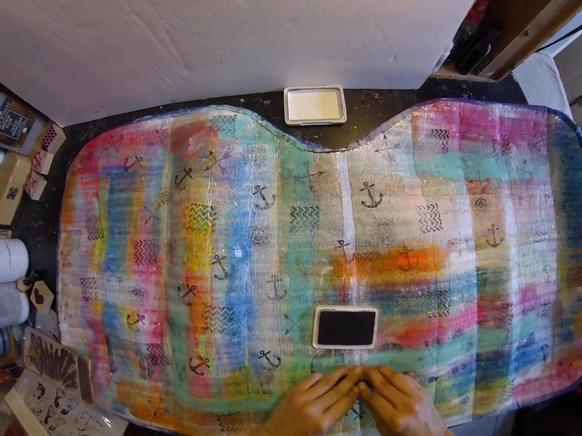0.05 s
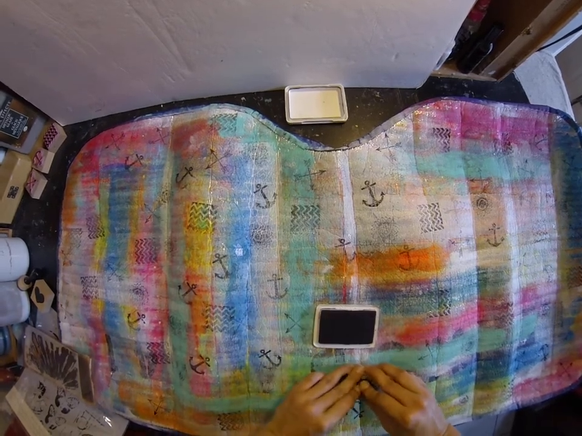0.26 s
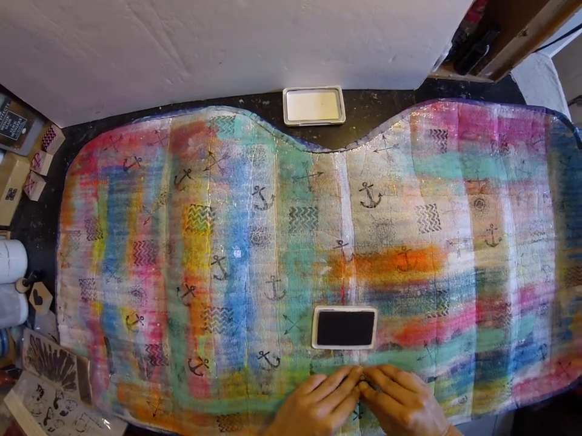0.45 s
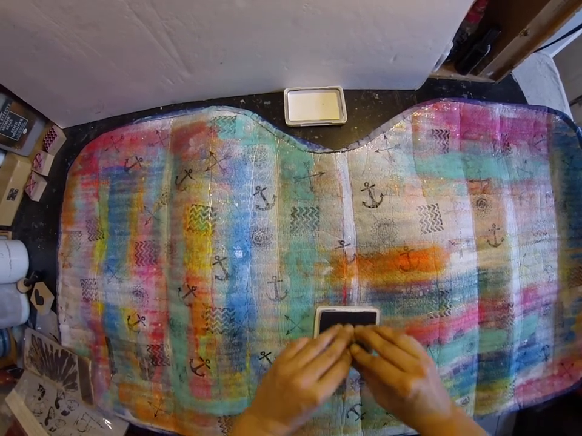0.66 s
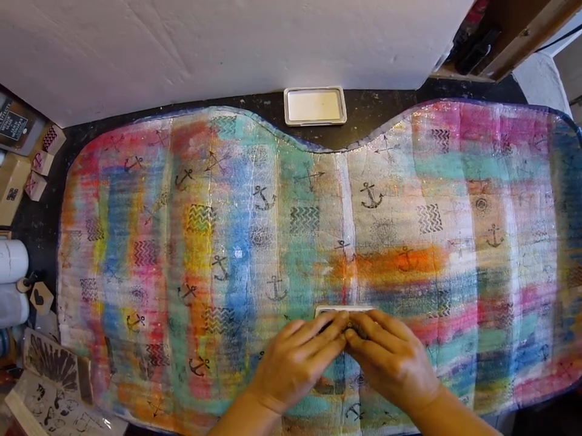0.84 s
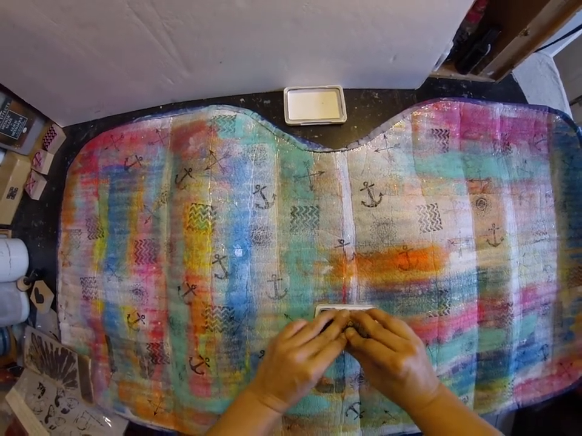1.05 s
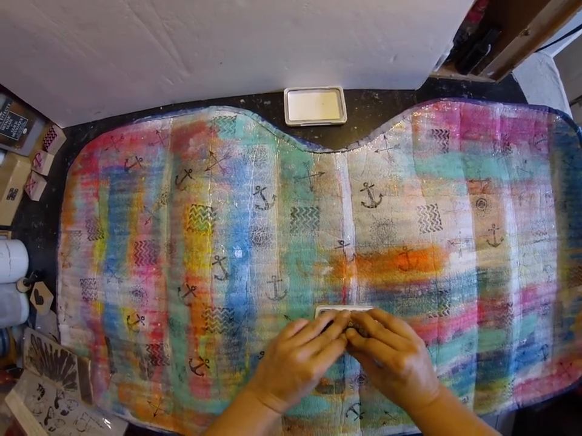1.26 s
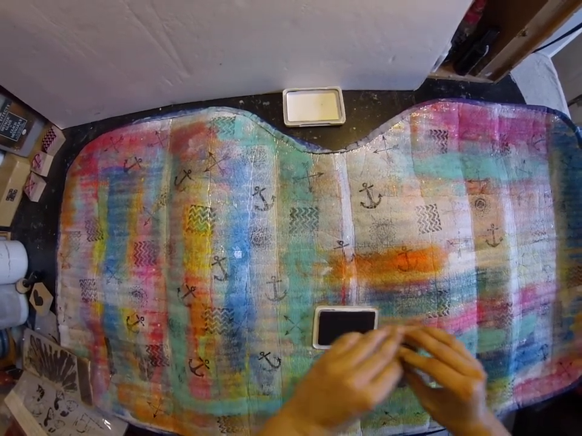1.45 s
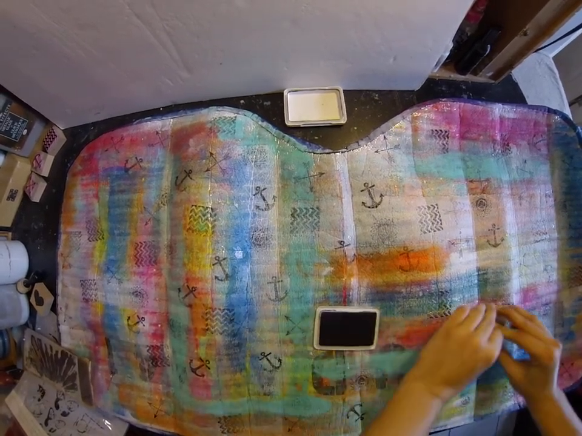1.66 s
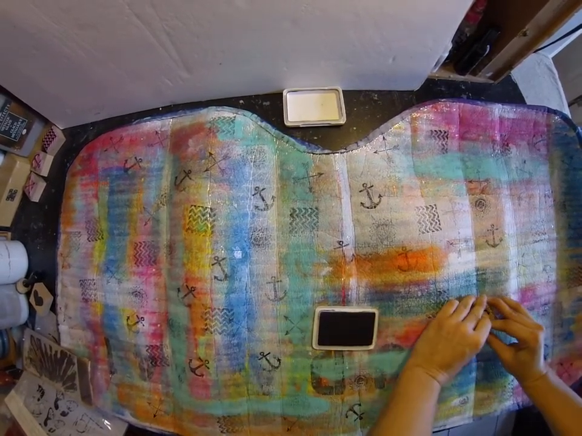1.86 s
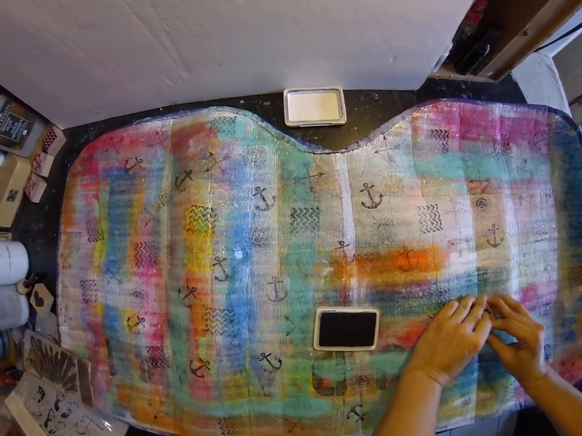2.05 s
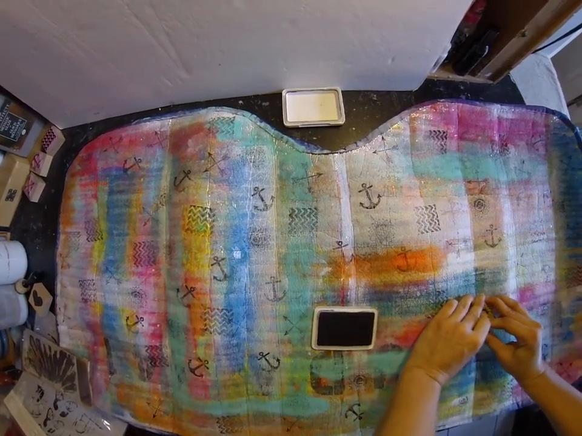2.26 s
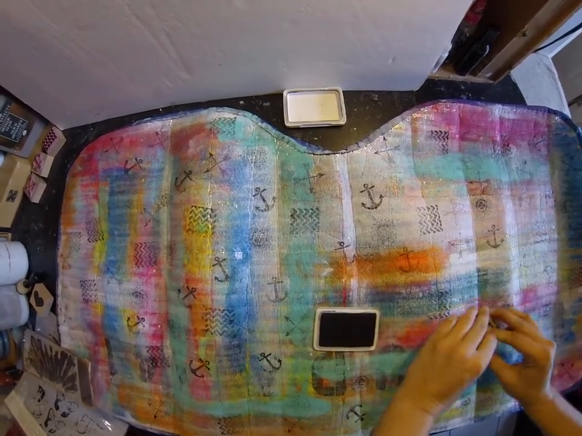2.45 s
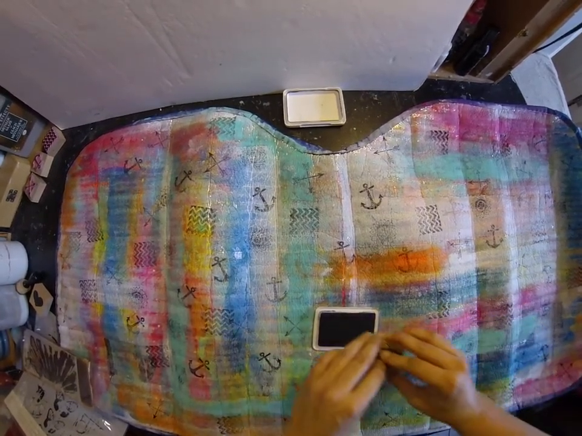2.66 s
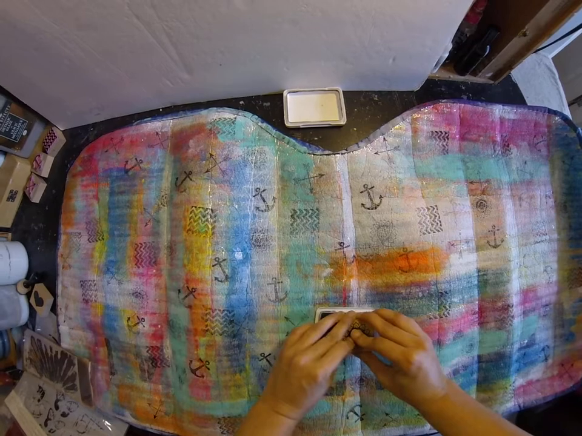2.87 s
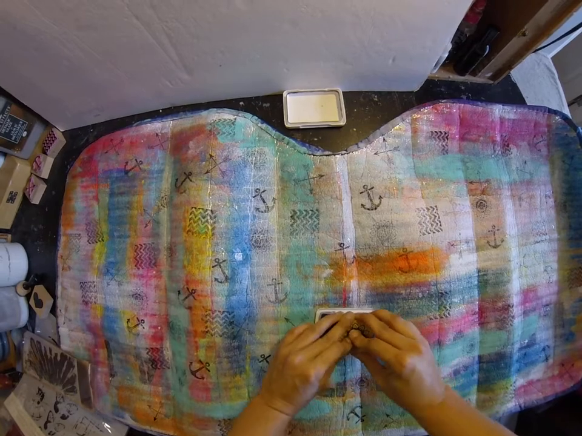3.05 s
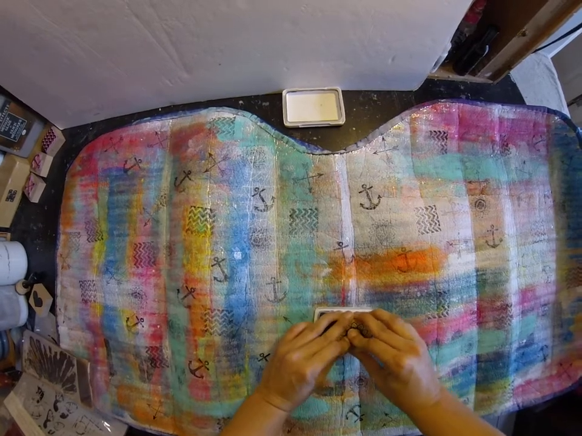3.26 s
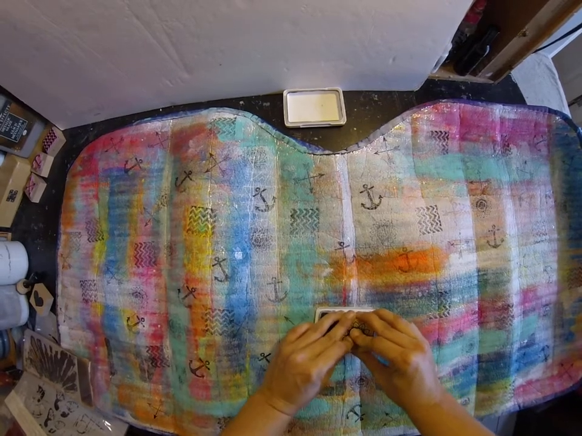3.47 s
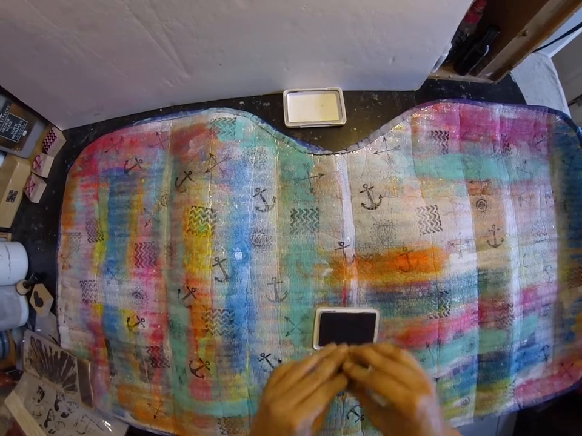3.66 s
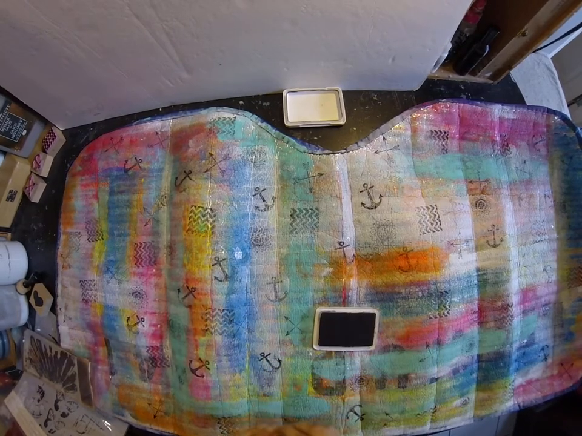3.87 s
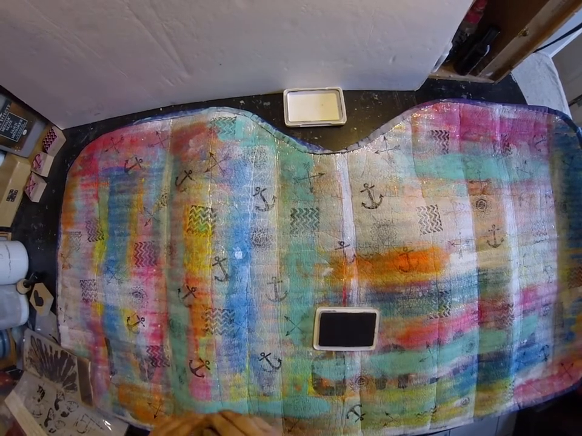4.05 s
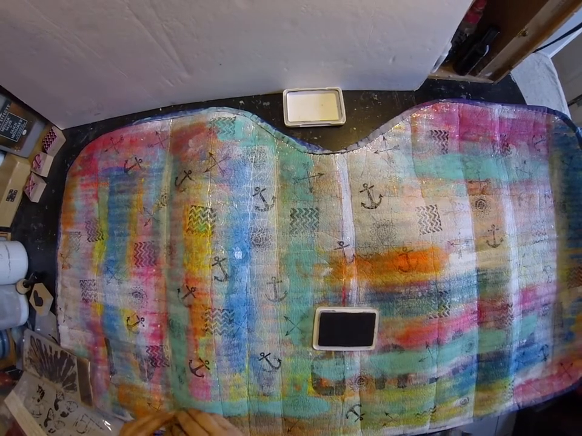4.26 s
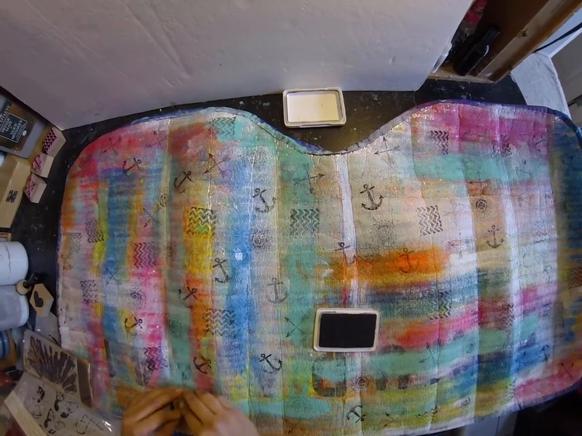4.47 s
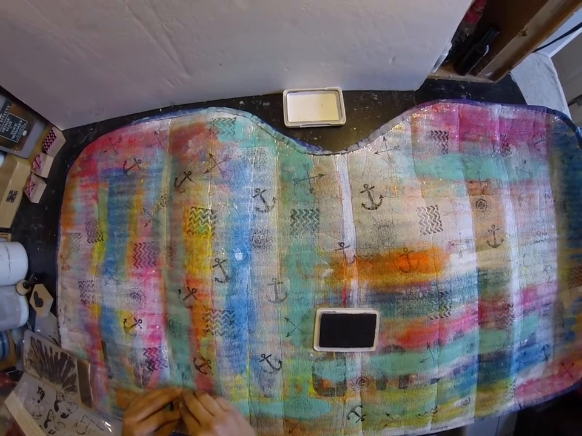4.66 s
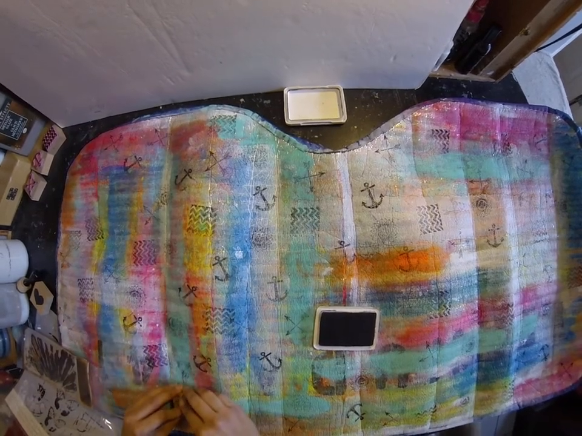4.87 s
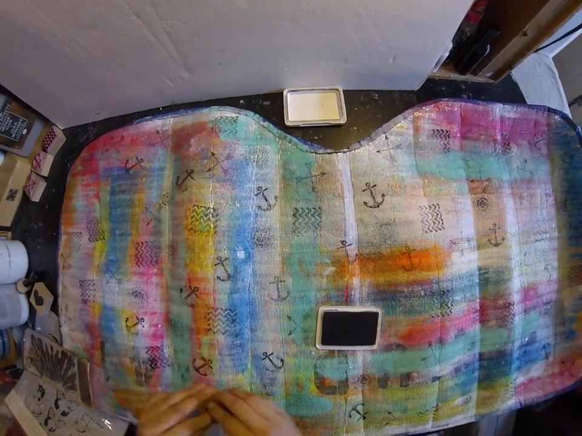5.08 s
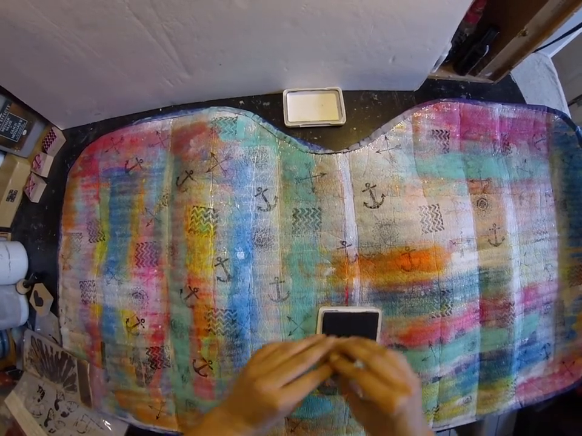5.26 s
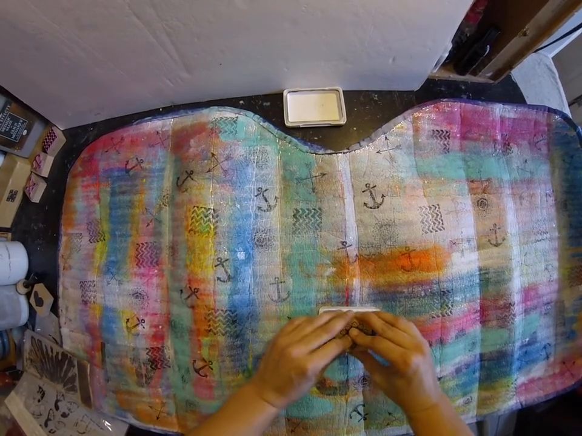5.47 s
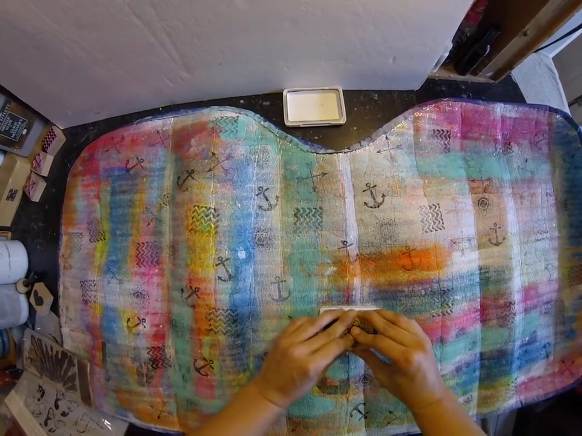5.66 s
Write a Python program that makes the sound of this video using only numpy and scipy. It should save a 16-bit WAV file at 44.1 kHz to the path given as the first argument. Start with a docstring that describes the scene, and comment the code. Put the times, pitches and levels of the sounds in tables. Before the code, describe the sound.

In a small room, light clicks and bumps come from a wooden stamp block turning in the fingers. Five low table thumps follow at an even pace, with brighter knocks on the ink pad and duller ones on padded cloth. Between them come sticky ticks, peeling crackles and soft rubbing. A faint hum swells early and fades, while the microphone carries constant hiss, rumble and a very thin, high whine.

```python
"""First come soft ticks and bumps as a rubber stamp on a wooden block is handled. It is then tapped
in turn on an ink pad and on a padded sunshade lying on a table. Each press thumps the table and
knocks the block; tacky rubber crackles as it peels off, and the fabric rustles. A low hum comes
and goes in the small room, over a steady rumble and the hiss and thin pulsing whine of a camera."""
import sys
import numpy as np
from scipy import signal
from scipy.fft import rfft, irfft
from scipy.io import wavfile
from scipy.ndimage import uniform_filter1d

SR = 44100
rng = np.random.default_rng(int(sys.argv[2]) if len(sys.argv) > 2 else 0)


def put_to_file(sound):
    """Save the sound as 16-bit audio at rate SR, in the file named by the first command-line argument."""
    columns = np.atleast_2d(sound).T  # one column per channel
    safe = np.clip(columns, -1, 1)
    whole_steps = np.round(safe * 32767)
    wavfile.write(sys.argv[1], SR, whole_steps.astype(np.int16))


N = 252252

# room rumble and microphone hiss: (frequency [Hz], relative level [dB])
AIR_SPECTRUM = [(8, 1.5), (28, -1.5), (43, 0.5), (60, -13.5), (85, -16), (135, -16.5), (210, -24.5),
                (480, -30), (950, -36.5), (1400, -37), (2100, -41.5), (4000, -42), (11500, -41),
                (15000, -38.5)]
# how long the room rings; a ring time (t60) is a fall of 60 dB: (frequency [Hz], ring time [s])
ROOM_RING_TIMES = [(150, 0.48), (500, 0.36), (2000, 0.2), (6000, 0.32), (14000, 0.23)]
# hands and rubber slide: (time [s], length [s], level [dB], centre [Hz], width [octaves])
RUBS = [(.0, 0.081, -46, 12200, 0.45), (0.177, 0.31, -55.5, 229, 2.6), (1.2, 0.66, -61.5, 5100, 0.35),
        (1.732, 0.16, -55.5, 5160, 0.65), (2.236, 0.039, -47, 1300, 3.9), (2.999, 0.48, -53, 148, 1.65),
        (3.391, .2, -55.5, 5500, 2.8), (3.593, .12, -54.5, 7500, 2), (4.553, .13, -50.5, 1980, 2.1),
        (4.717, 0.095, -53, 1990, 3.4), (5.521, 0.34, -45, 7350, 1.9), (5.602, 0.14, -51.5, 1500, 1.6)]
# the handled things squeak: (time [s], pitch [Hz], level [dB], rise [s], ring time [s])
SQUEAKS = [(1.025, 593, -27.5, 0.022, 0.068), (1.755, 1090, -33.5, 0.0098, 0.048),
           (3.147, 558, -30.5, 0.022, 0.12), (4.421, 2910, -44.5, 0.0006, .17)]
# sticky spots of ink let go: (time [s], level [dB], decay [s])
INK_TICKS = [(0.0257, -31, 0.0018), (0.0375, -35, .001), (0.359, -40, 0.0025), (1.414, -42, .004),
             (1.7315, -39, .002), (2.042, -37.5, 0.0091), (2.0526, -35, 0.0017), (2.2144, -38, .006),
             (2.2400, -32.5, .0014), (4.8656, -40, 0.0062), (3.645, -50, 0.0073), (5.5885, -40, .014),
             (5.6383, -34.5, 0.0027)]
# the block rocks under the fingers: (time [s], level [dB], decay [s], low edge [Hz], high edge [Hz])
FINGER_TAPS = [(0.053, -47.5, 0.018, 497, 4200), (0.161, -46, 0.01, 450, 2170),
               (0.535, -45, 0.0035, 450, 1690), (2.040, -36.5, 0.0037, 900, 2880),
               (3.027, -38.5, 0.0054, 694, 4830), (4.306, -44.5, 0.014, 1030, 2230),
               (4.42, -43, 0.0036, 980, 3800), (5.675, -40.5, 0.0074, 950, 2230)]
# the stamp peels off the cloth:
# (release time [s], cling length [s], crackle [dB], clack [dB], fizz [dB], snap decay [s])
PEELS = [(0.3885, 0.068, -47, -29, -28, 0.0029), (2.2600, .06, -48, -39.5, -30.5, .0035),
         (4.876, 0.026, -35, -35.5, -39, 0.0088)]
# the block bumps lightly as it is handled: (time [s], knock [dB], dull above [Hz], thud [dB])
BUMPS = [(.104, -32, 300, -37), (.137, -20.5, 450, -36), (0.1968, -11, 557, -31), (.211, -17.5, 540, -41),
         (0.362, -19, 450, -38.5), (0.5347, -21, 650, -36.5), (1.35, -23.5, 700, -42),
         (2.044, -23, 710, -46), (3.646, -24.5, 945, -38), (4.726, -23.5, 1160, -54),
         (4.874, -23, 605, -53)]
# tones the block rings with on the table top: (pitch [Hz], relative level [dB], ring time [s])
BLOCK_MODES = [(204.6, -33.5, 0.12), (266.6, -20.5, 0.07), (313, -16.5, 0.078), (352.2, -20.5, 0.1),
               (397, -17, 0.078), (479.3, -18.5, 0.072), (512, -20, 0.056), (574, -29, 0.1),
               (703, -21.5, 0.077), (810, -27.5, 0.076), (983, -17.5, 0.028), (1150, -15.5, 0.024),
               (1180, -24.5, 0.026), (1242, -30, 0.032), (1970, -22, 0.021)]
# low tones of the table: (pitch [Hz], relative level [dB], ring time [s])
TABLE_MODES = [(43.8, -4.5, .24), (55.2, -4.5, 0.19), (65.3, -26, 0.59), (86.5, -25, 0.12),
               (115, -12.5, 0.092), (129.1, -19, 0.31)]
# the stamp comes down, in turn on ink pad and cloth: (time [s], thump [dB], thump tilt [dB/octave],
# knock [dB], dull above [Hz], thud [dB], clack [dB], fizz [dB], time to sink in [s], slap decay [s])
PRESSES = [(0.6374, -2.5, 0, -5, 1510, -29, -38.5, -33, 0.00028, 0.0065),
           (1.6521, 0, 0, -15, 190, -18.5, -35.5, -27.5, 0.0022, 0.0076),
           (2.701, 2, 1.5, 3, 1590, -25.5, -26, -27.5, 0.00026, 0.0036),
           (4.352, -0.5, 1, -9.5, 298, -31, -39.5, -35.5, .008, .019),
           (5.310, -4.5, 4, -6, 710, -36, -39.5, -37, 0.00037, 0.01)]


def gain_of(db):
    """Turns decibels into a factor to multiply by."""
    return 10 ** (np.asarray(db) / 20)


def unit_rms(x):
    """Scales a signal to an average (rms) size of 1."""
    return x / np.sqrt(np.mean(x ** 2) + 1e-20)


def curve_at(points, hz):
    """Joins (frequency, value) points along a log-frequency axis."""
    point_hz, value = np.transpose(points)
    return np.interp(np.log(hz + 1), np.log(point_hz + 1), value)


def add(mix, s, sound):
    """Adds a sound to the mix, starting s seconds in."""
    part = mix[max(round(s * SR), 0):][:len(sound)]
    part += sound[:len(part)]


def ring(t, hz, db, t60):
    """One tone that dies away."""
    return gain_of(db) * np.exp(-np.log(1000) * t / t60) * np.sin(2 * np.pi * hz * t)


def hump(t, length):
    """A smooth rise and fall."""
    return np.sin(np.pi * np.clip(t / length, 0, 1)) ** 2


def wander(size, smooth_samples):
    """A smoothed random wobble."""
    return unit_rms(uniform_filter1d(rng.standard_normal(size), smooth_samples))


def grit(band_hz, grain_db, size):
    """Tiny slips of uneven size, heard in one band; more grain_db makes them rougher."""
    slips = rng.standard_normal(size) * gain_of(grain_db * np.minimum(rng.exponential(1, size), 4))
    band = signal.butter(2, band_hz, "band", fs=SR, output="sos")
    return unit_rms(signal.sosfilt(band, slips))


def stroke(length_s, db, band_hz, grain_db):
    """A run of slips that swells and fades."""
    t = np.arange(SR) / SR
    return gain_of(db) * hump(t, length_s) * grit(band_hz, grain_db, size=len(t))


def add_click(mix, s, db, band_hz, decay_s, rise_s=0.0002):
    """Adds a cluster of slips that builds up to time s and dies quickly."""
    lead_s = 5 * rise_s
    t = np.arange(SR // 6) / SR - lead_s
    force = np.exp(np.minimum(t / rise_s, -t / decay_s))
    burst = force * grit(band_hz, grain_db=7.5, size=len(t))
    add(mix, s - lead_s, gain_of(db) * burst * np.linalg.norm(force) / np.linalg.norm(burst))


def add_slap(mix, s, clack_db, fizz_db, decay_s, rise_s=0.00022):
    """Adds rubber meeting or leaving a surface: a clack with a sticky fizz above it."""
    clack_hz, fizz_hz = (830, 2400), (2840, 14800)
    add_click(mix, s, clack_db, clack_hz, decay_s, rise_s)
    add_click(mix, s, fizz_db, fizz_hz, decay_s, rise_s)


def air(level_db=-39):
    """Steady microphone hiss above a low room rumble."""
    hz = np.fft.rfftfreq(N, 1 / SR)
    spectrum = rfft(rng.standard_normal(N)) * gain_of(curve_at(AIR_SPECTRUM, hz))
    return gain_of(level_db) * unit_rms(irfft(spectrum, N))


def camera_whine(pitch_hz=12882, drift_hz=24, frame_hz=47.95, on_share=0.42, level_db=-62.3):
    """The camera's electronics whistle for a part of each frame, never quite on one pitch."""
    busy = np.arange(N) / SR * frame_hz % 1 < on_share
    pulses = uniform_filter1d(busy.astype(float), size=40)
    hz = pitch_hz + drift_hz * wander(N, smooth_samples=300)
    return gain_of(level_db) * unit_rms(pulses * np.sin(2 * np.pi * np.cumsum(hz) / SR))


def hum(pitch_hz=149, drift_hz=0.88, base_db=-44.5):
    """A nearly pure low tone that swells, throbs slowly, grows quieter and stops."""
    start_s, end_s, rise_s, fall_s = 1.33, 2.85, 0.27, 0.33
    throb_hz, throb_db, throb_peak_s = 1.65, 2, 1.83
    sag_db_per_s, waver_db = 5.5, 0.5
    t = np.arange(N) / SR
    steps_s = np.linspace(0, t[-1], 50)
    waver, drift = (np.interp(t, steps_s, row) for row in rng.standard_normal((2, 50)))
    fade = np.clip(np.minimum((t - start_s) / rise_s, (end_s - t) / fall_s), 0, 1)
    throb = throb_db * np.cos(2 * np.pi * throb_hz * (t - throb_peak_s))
    level = fade * gain_of(base_db - sag_db_per_s * (t - start_s) + throb + waver_db * waver)
    return np.sqrt(2) * level * np.sin(2 * np.pi * np.cumsum(pitch_hz + drift_hz * drift) / SR)


def room(sound, turn_s, gap_s=0.003, paths=5):
    """Dense echoes of a small room, each band dying at its own speed; the paths change every turn_s."""
    echoes = rng.standard_normal((paths, SR // 2)) * (np.arange(SR // 2) > gap_s * SR)
    hz, t, bands = signal.stft(echoes, SR, nperseg=256)
    decay = np.exp(-np.log(1000) * t / curve_at(ROOM_RING_TIMES, hz)[:, None])
    tails = signal.istft(bands * decay, SR, nperseg=256)[1]
    tails /= np.linalg.norm(tails, axis=1, keepdims=True)
    turn = (np.arange(N) / (turn_s * SR) - np.arange(paths)[:, None]) % paths
    feeds = sound * np.sqrt(hump(turn, 2.11))  # the turns overlap, so the power stays nearly even
    return signal.fftconvolve(feeds, tails, axes=1).sum(0)[:N]


def rubs():
    """Cloth fibres catch and let go as hands and rubber slide over them."""
    out = np.zeros(N)
    for s, length_s, db, centre_hz, octaves in RUBS:
        spread = 2 ** (octaves / 2)
        add(out, s, stroke(length_s, db, (centre_hz / spread, centre_hz * spread), grain_db=10))
    return out


def squeaks(waver_per_s=3.5):
    """Faint tones that swell and die; the slower they swell, the less steady their pitch."""
    t, out = np.arange(SR // 4) / SR, np.zeros(N)
    for s, hz, db, rise_s, t60 in SQUEAKS:
        waver = waver_per_s * rise_s * wander(len(t), smooth_samples=150)
        uneven_t = np.cumsum(1 + waver) / SR
        add(out, s, (1 - np.exp(-t / rise_s)) * ring(uneven_t, hz, db, t60))
    return out


def ink_ticks(band_hz=(6340, 16000)):
    """Sticky spots of ink part with thin, bright ticks."""
    out = np.zeros(N)
    for s, db, decay_s in INK_TICKS:
        add_click(out, s, db, band_hz, decay_s)
    return out


def finger_taps():
    """Small dry clacks as the fingers rock the block."""
    out = np.zeros(N)
    for s, db, decay_s, low_hz, high_hz in FINGER_TAPS:
        add_click(out, s, db, (low_hz, high_hz), decay_s)
    return out


def rubber_peels(crackle_hz=(2450, 15000), trail_s=0.028):
    """Tacky rubber clings to the cloth with a crackle, snaps free and crackles on for trail_s."""
    out = np.zeros(N)
    for s, cling_s, crackle_db, clack_db, fizz_db, decay_s in PEELS:
        add(out, s - cling_s, stroke(cling_s + trail_s, crackle_db, crackle_hz, grain_db=6))
        add_slap(out, s, clack_db, fizz_db, decay_s)
    return out


def rubber_slaps(lag_s=0.00107):
    """The rubber lands at once on the ink pad, but sinks into the cloth first."""
    out = np.zeros(N)
    for s, *_, clack_db, fizz_db, sink_s, decay_s in PRESSES:
        add_slap(out, s + lag_s, clack_db, fizz_db, decay_s, rise_s=sink_s)
    return out


def block_knocks(lag_s=0.001113, build_s=0.0016):
    """The block rings at each contact, dull on cloth and brighter on the ink pad; the padding thuds."""
    t, out = np.arange(SR // 3) / SR, np.zeros(N)
    landings = [(s + lag_s, knock_db, dull_hz, thud_db)
                for s, _, _, knock_db, dull_hz, thud_db, *_ in PRESSES]
    for s, knock_db, dull_hz, thud_db in landings + BUMPS:
        tones = sum(ring(t, hz, db, t60) / (1 + (hz / dull_hz) ** 3) for hz, db, t60 in BLOCK_MODES)
        add(out, s, gain_of(knock_db) * (1 - np.exp(-t / build_s)) * tones)
        add_click(out, s, thud_db, band_hz=(77, 187), decay_s=0.018)
    return out


def table_thumps(puff_db=-14, puff_s=0.00764, echo_db=-11, echo_s=0.0124, lag_s=0.0062, build_s=0.015):
    """The stamp pushes out a puff of air; then the table gives way and swings with its low tones."""
    t, out = np.arange(SR // 2) / SR, np.zeros(N)
    puff = gain_of(puff_db) * (hump(t, puff_s) + gain_of(echo_db) * hump(t - echo_s, puff_s))
    swing_t = np.maximum(t - lag_s, 0)
    build_up = 1 - np.exp(-swing_t / build_s)
    lowest_hz = TABLE_MODES[0][0]
    for s, thump_db, tilt_db, *_ in PRESSES:
        swing = sum(ring(swing_t, hz, db + tilt_db * np.log2(hz / lowest_hz), t60)
                    for hz, db, t60 in TABLE_MODES)
        add(out, s, gain_of(thump_db) * (puff - build_up * swing))
    return out


def scene(ring_room_db=-11, touch_room_db=-4):
    """The stamping and its room echoes over the hum, hiss and whine."""
    rings = block_knocks() + squeaks()
    touch = rubber_slaps() + rubber_peels() + finger_taps() + ink_ticks() + rubs()
    # the block sounds from where the hand holds it; every slip comes from a new spot
    echoes = gain_of(ring_room_db) * room(rings, turn_s=0.4)
    echoes += gain_of(touch_room_db) * room(touch, turn_s=0.003)
    return (table_thumps() + rings + touch + echoes + hum() + air() + camera_whine())[None]


def record(dry):
    """Cuts the highest treble and shifts the wave up, as a converter that rests off centre does."""
    cutoff_hz, offset = 15500, 0.128
    low_pass = signal.firwin(401, cutoff_hz, window=("kaiser", 9), fs=SR)
    return signal.oaconvolve(dry, low_pass[None], "same") + offset


dry = scene()
out = record(dry)
put_to_file(out)
```